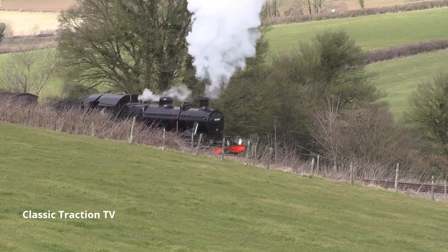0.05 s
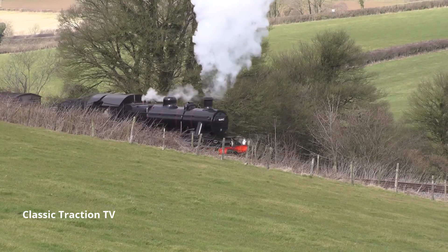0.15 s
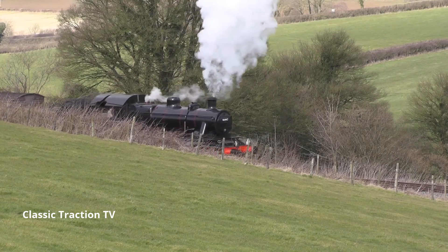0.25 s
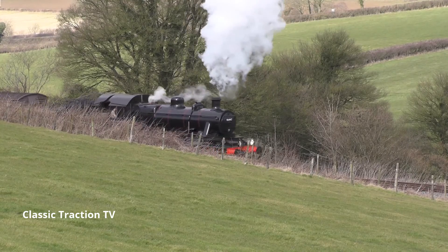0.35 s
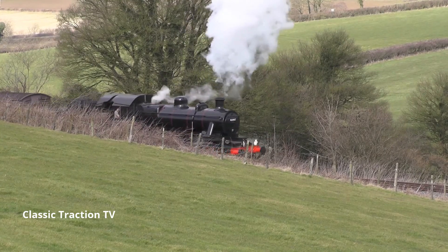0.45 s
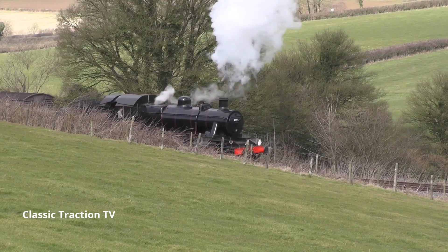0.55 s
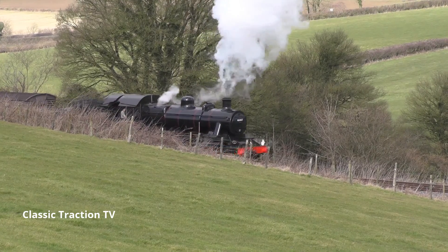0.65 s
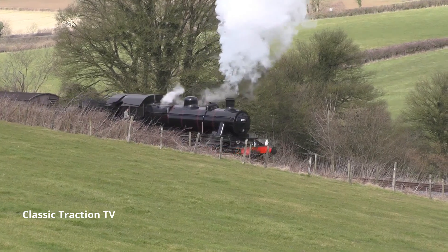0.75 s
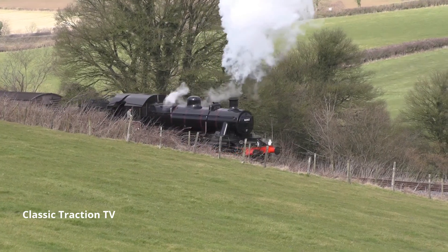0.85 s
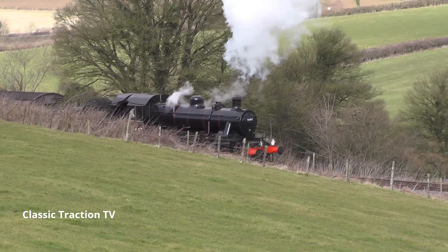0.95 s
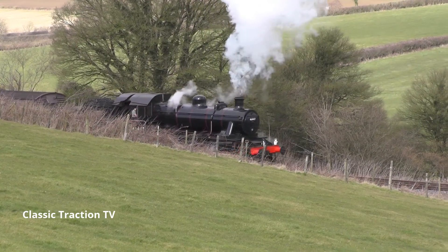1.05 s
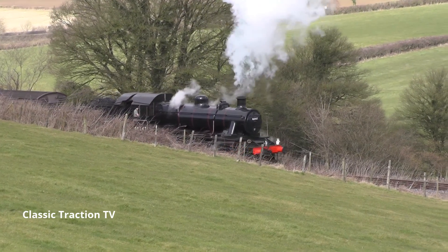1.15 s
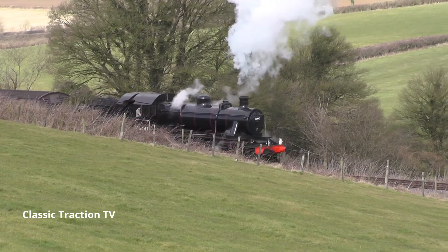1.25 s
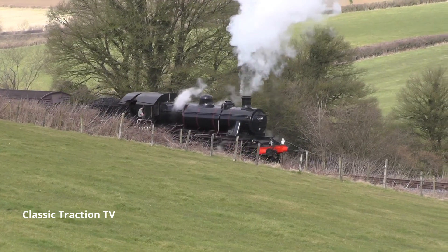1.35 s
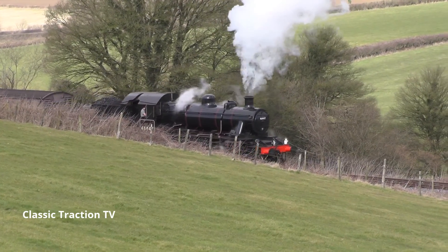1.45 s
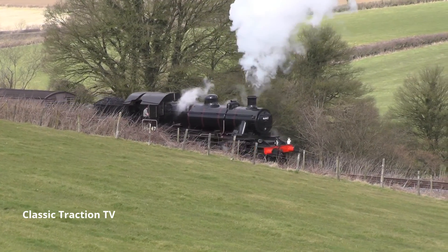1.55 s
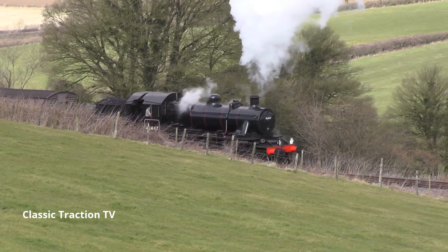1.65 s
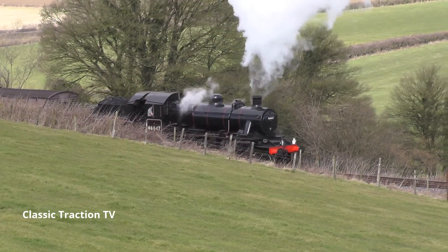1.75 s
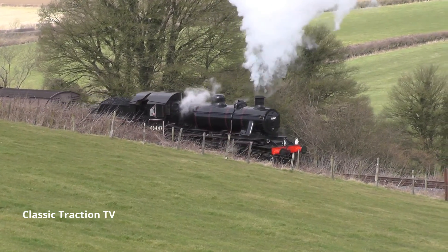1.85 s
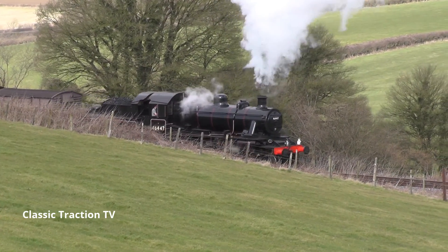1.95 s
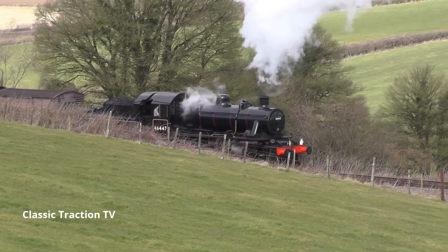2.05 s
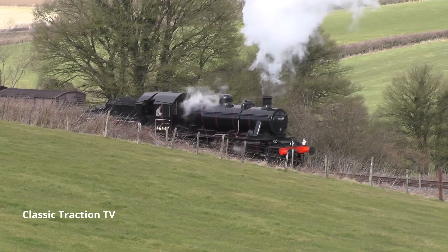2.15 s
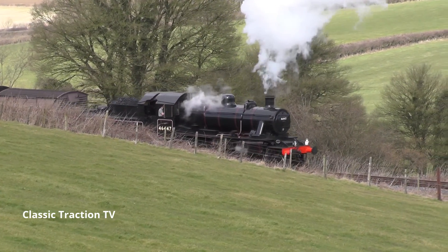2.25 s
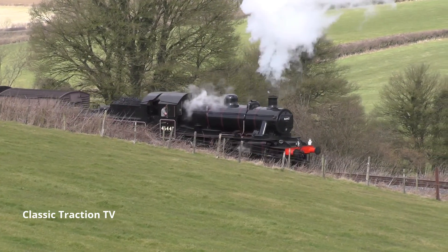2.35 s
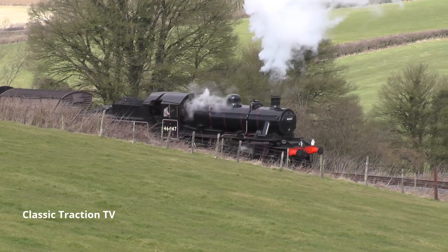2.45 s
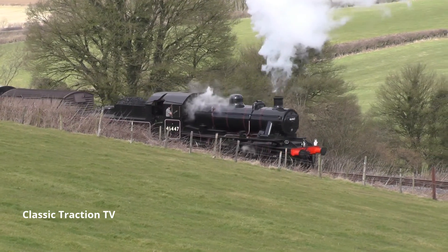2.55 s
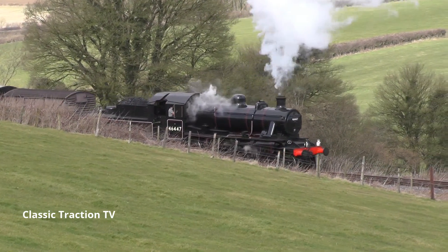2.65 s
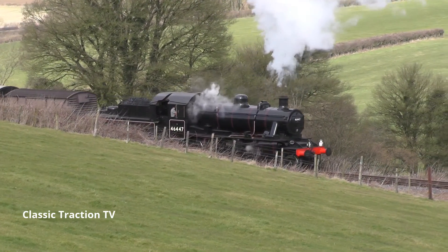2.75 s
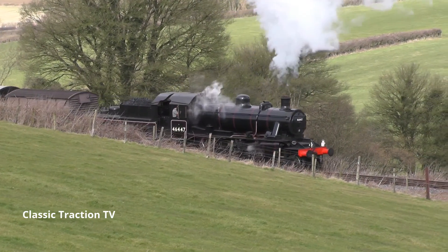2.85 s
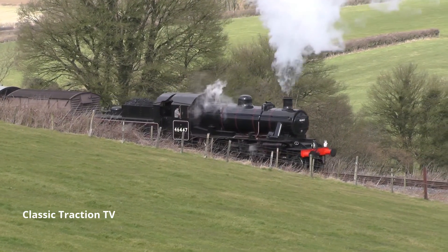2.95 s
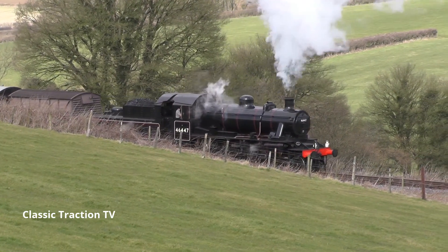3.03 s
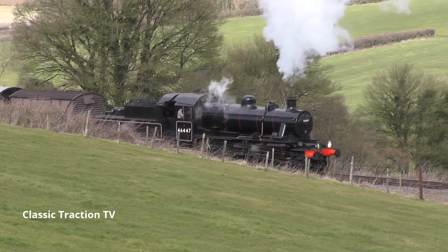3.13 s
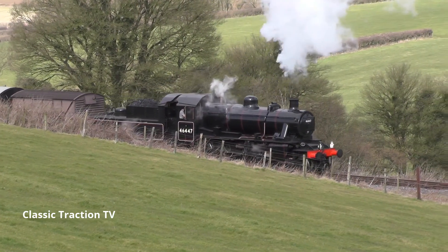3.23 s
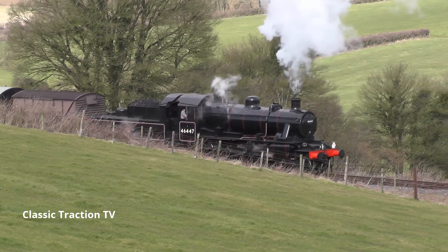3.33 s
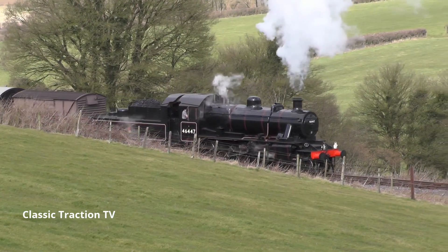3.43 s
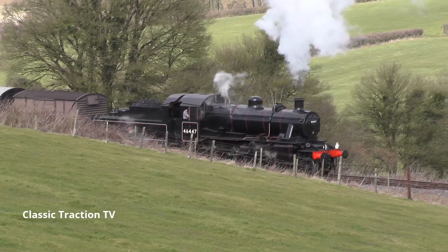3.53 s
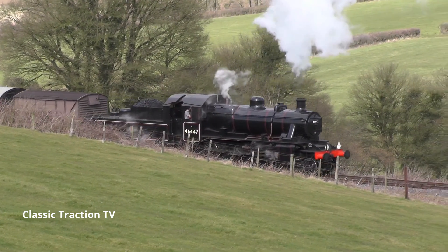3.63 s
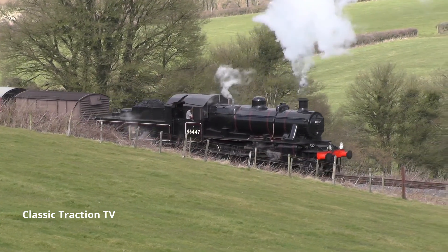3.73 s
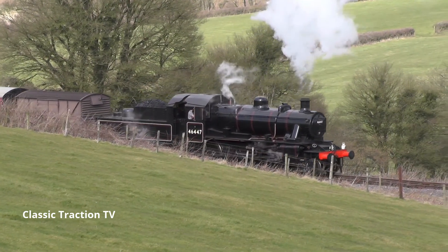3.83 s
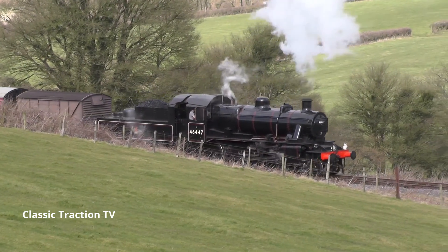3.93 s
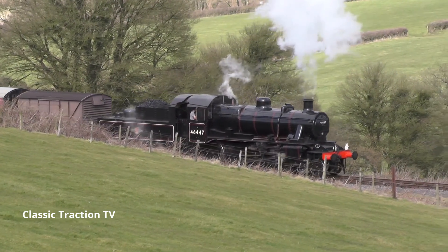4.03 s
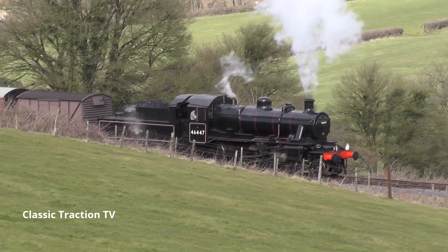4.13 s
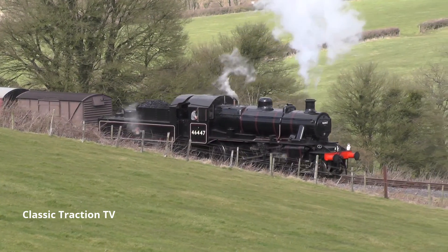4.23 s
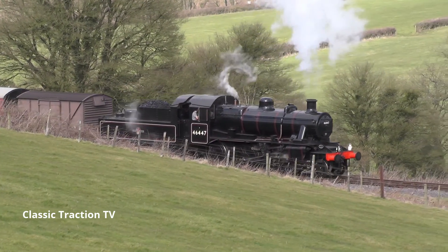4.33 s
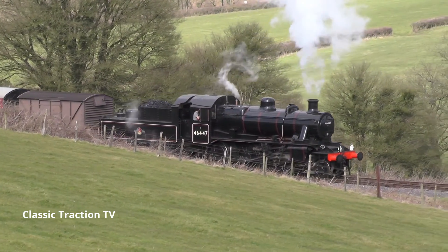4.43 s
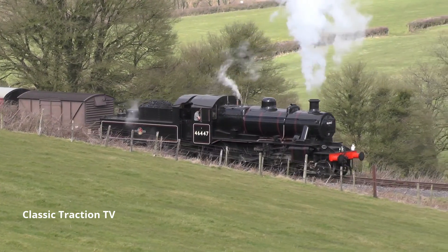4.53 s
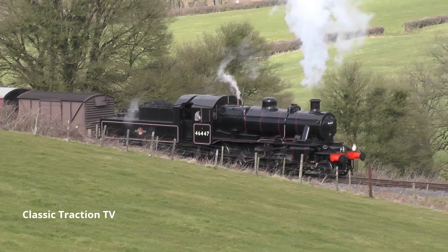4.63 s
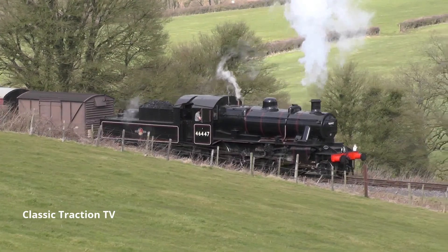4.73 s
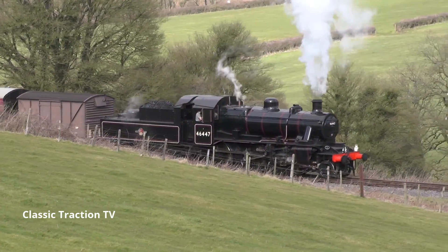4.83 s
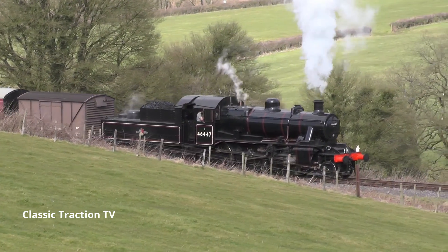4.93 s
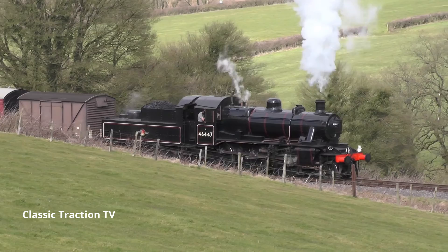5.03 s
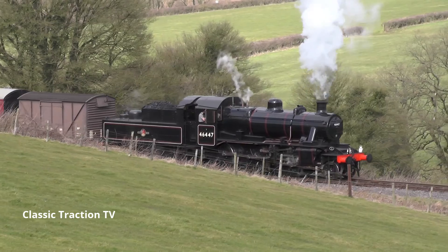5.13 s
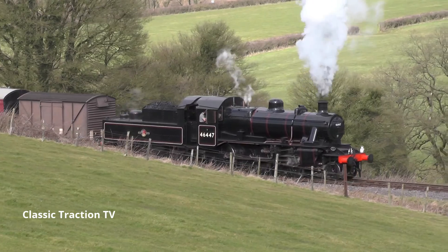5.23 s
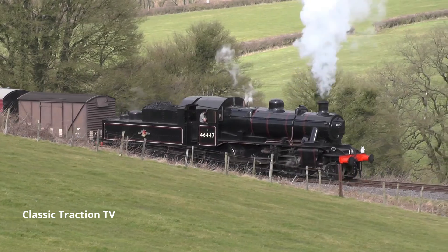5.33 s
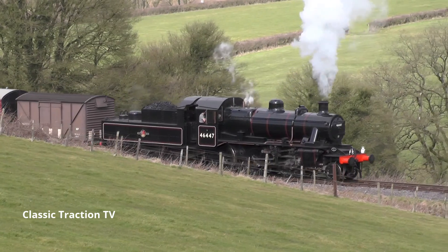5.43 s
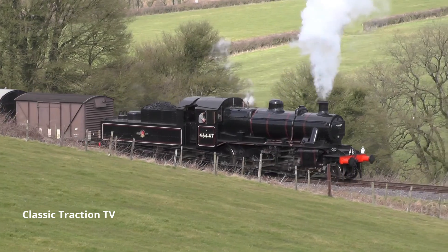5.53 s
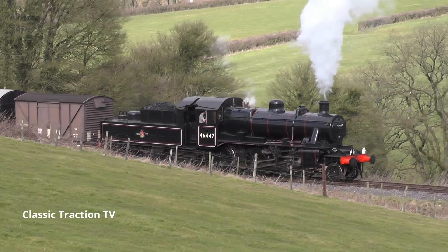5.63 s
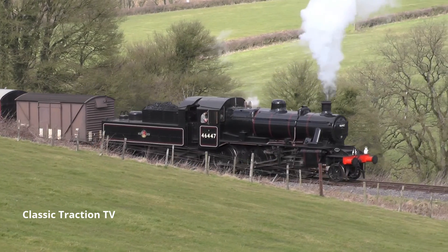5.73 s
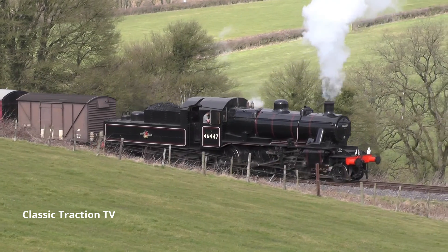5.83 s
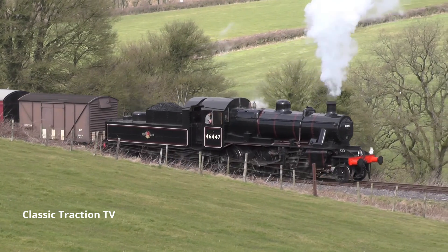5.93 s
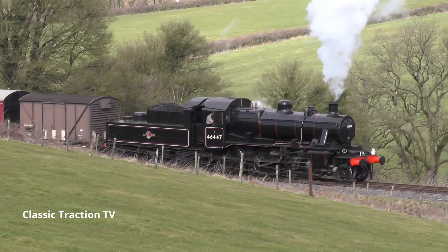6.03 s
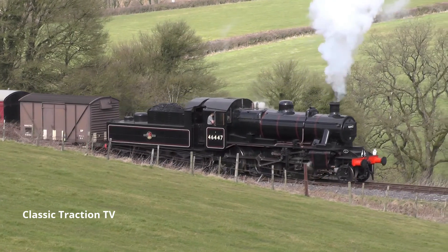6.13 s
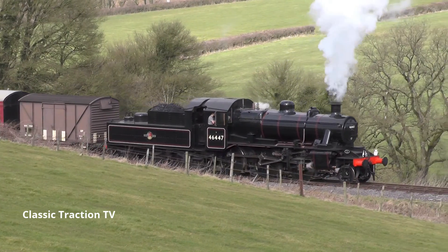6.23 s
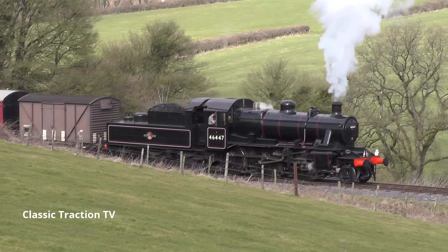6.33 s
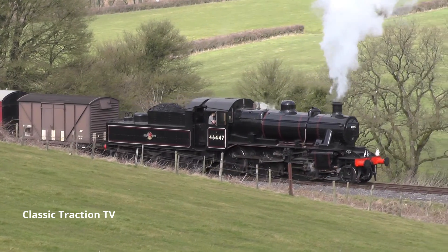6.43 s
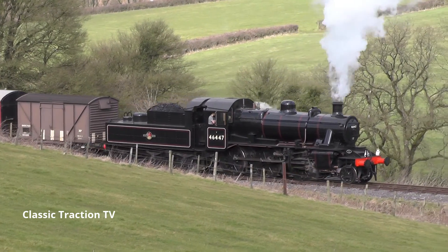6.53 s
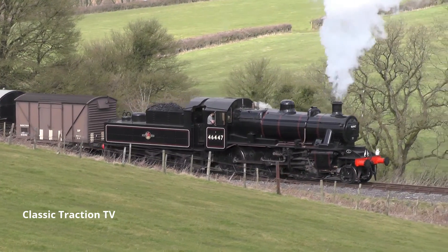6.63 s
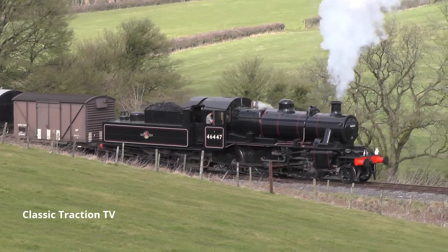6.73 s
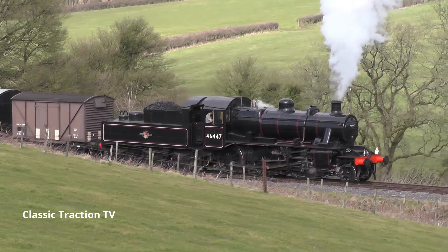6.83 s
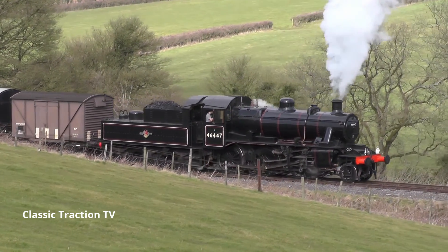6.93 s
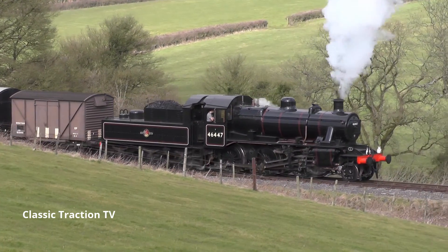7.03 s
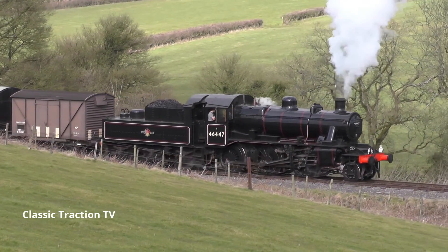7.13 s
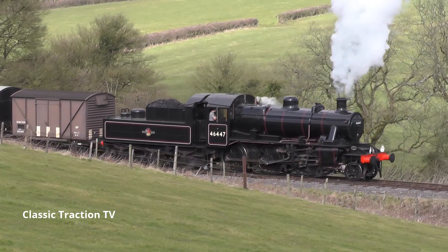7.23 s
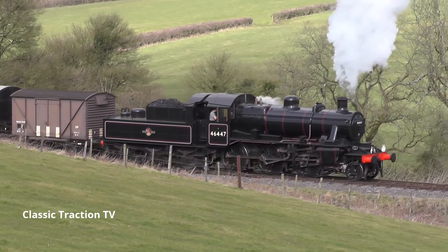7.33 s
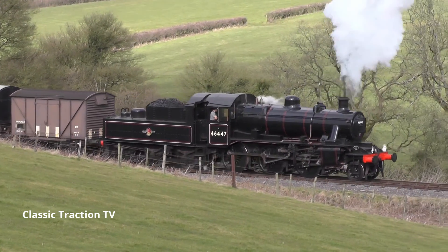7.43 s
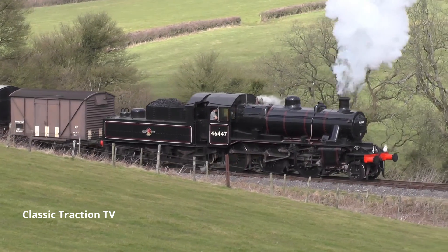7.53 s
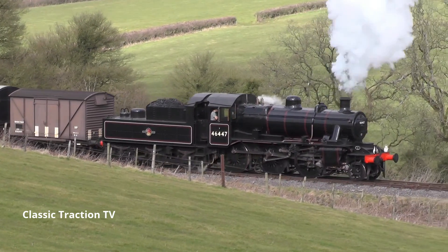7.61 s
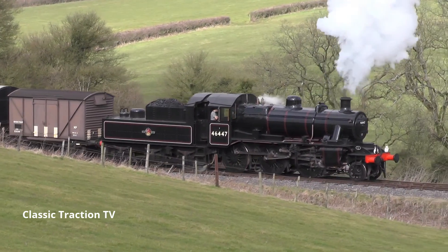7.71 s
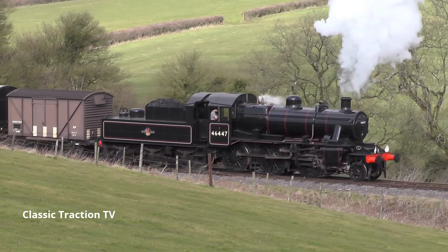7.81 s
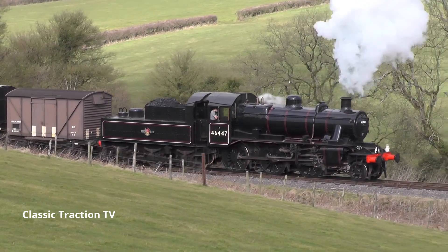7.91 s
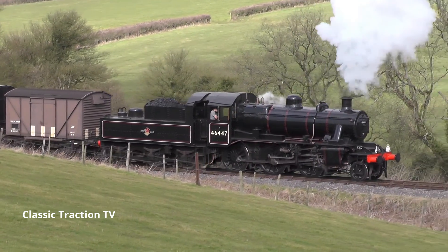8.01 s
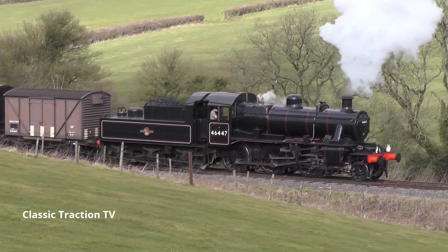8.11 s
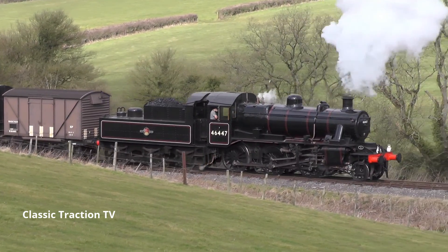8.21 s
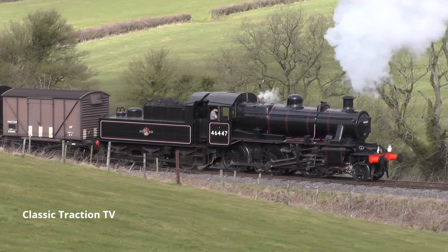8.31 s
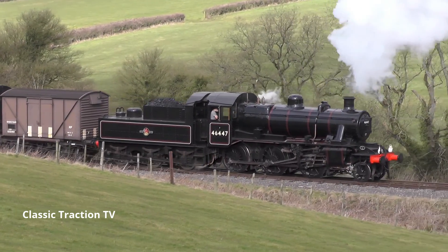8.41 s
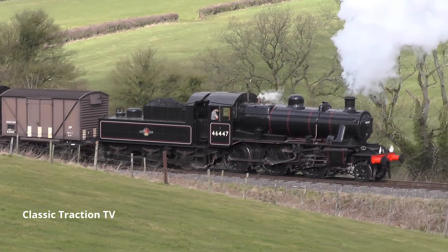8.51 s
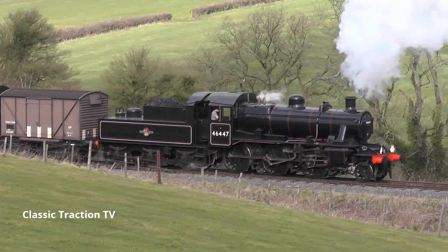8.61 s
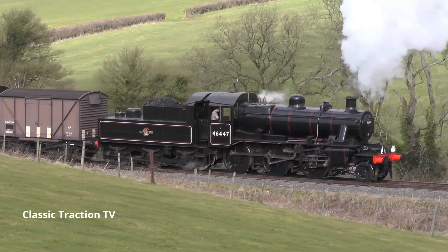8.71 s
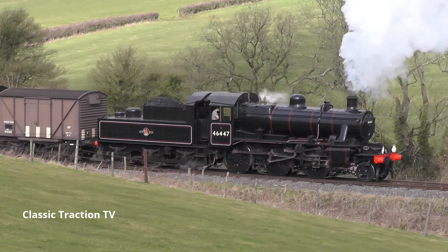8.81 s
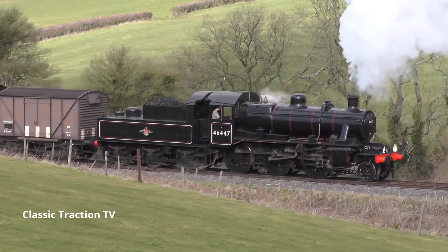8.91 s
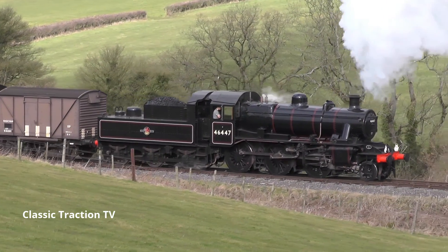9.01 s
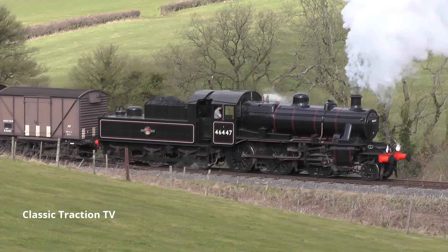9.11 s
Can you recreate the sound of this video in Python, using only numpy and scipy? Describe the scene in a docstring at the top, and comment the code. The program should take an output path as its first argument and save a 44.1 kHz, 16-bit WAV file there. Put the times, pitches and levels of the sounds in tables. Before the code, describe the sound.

Regular exhaust beats of a working steam engine, first distant, dull and booming, then stronger with a rough rush of steam after four seconds. Under them lie steady wagon rumble, faint metallic wheel ringing, rail sizzle and leaking steam. The train sits somewhat left, with a dull short echo from trees behind. Soft low gusts come and go, becoming strong microphone buffeting in the last three seconds.

```python
"""A steam locomotive and its wagons draw near, beating from about 2.5 to over 3 times a second.
First come muffled chimney booms (noise through resonances), some with a sharp spit of steam, over rumble,
ringing wheels (noise-driven modes), rail treble and leaking steam (coloured noise).
From about 4 s the beats grow louder, with a stronger rush of steam (flow-gated noise bands).
Breeze (opposed and separate low noise) comes in gusts, strongest in the last 3 s; trees add a dull tail."""
import sys
import numpy as np
from scipy import signal
from scipy.fft import rfft, irfft, next_fast_len
from scipy.io import wavfile
from scipy.ndimage import uniform_filter1d, map_coordinates

SR = 44100
rng = np.random.default_rng(int(sys.argv[2]) if len(sys.argv) > 2 else 0)


def store_wav(level_fs):
    """Save 16-bit WAV to argv[1]."""
    pcm = np.round(np.clip(np.atleast_2d(level_fs), -1, 1) * 32767)
    wavfile.write(sys.argv[1], SR, pcm.T.astype(np.int16))


N = 403956
TIME = np.arange(N) / SR
SIZE = next_fast_len(N)
FREQS = np.arange(SIZE // 2 + 1) * SR / SIZE

# Levels are before the trims in the functions; spectra and modes are relative.
# exhaust beats: [t/s, rasp level/dB, hiss level/dB, rasp brightness/dB]
BEATS = [(-0.015, -55.5, -60.5, 0), (0.382, -60, -62.5, -9), (0.789, -49.5, -64, 5),
         (1.18, -53.5, -81, -0.5), (1.573, -49.5, -61, -3.5), (1.965, -55.5, -77, -3),
         (2.363, -52.5, -59, -1), (2.75, -50.5, -66, 3), (3.126, -49.5, -76, -2), (3.512, -49.5, -56, 2),
         (3.889, -46, -65, 6.5), (4.258, -55, -63, 1), (4.619, -45, -56, -1), (4.982, -38.5, -49.5, 3.5),
         (5.347, -35.5, -49.5, 0), (5.689, -45, -62.5, 1), (6.031, -37.5, -58.5, -3), (6.367, -40, -50, -4),
         (6.711, -37.5, -55, 0.5), (7.035, -45, -57.5, -3.5), (7.362, -47.5, -61.5, -5),
         (7.683, -41.5, -52.5, 0), (8.007, -40, -52.5, 0), (8.316, -43.5, -62.5, -9.5),
         (8.624, -45, -59.5, -6.5), (8.937, -52, -64, -8)]
# nearing engine: [t/s, boom level/dB, roar level/dB, hiss lead/s]
NEARNESS = [(0, -28.5, -57, 0.025), (.8, -28, -46.5, 0.018), (1.9, -29, -51.5, 0.025),
            (3.2, -27, -52.5, 0.026), (4.3, -22, -47, 0.0056), (5.35, -20.5, -37.5, 0.014),
            (6, -21.5, -38.5, 0.008), (7, -19.5, -37.5, 0.0015), (9.16, -22.5, -41.5, 0.00057)]
# nearing path: [t/s, Doppler pitch ratio, ground dip/dB, boom brightness/dB]
APPROACH = [(0, 1.062, -3.5, -2.5), (3, 0.97, -3.5, 2.5), (5, 0.93, -2, 1), (7, .975, 0, -1.5),
            (9.16, 0.92, -0.5, -5)]
# flow of a beat through chimney, through jet: (attack/s, hold/s, release/dB per s)
CHIMNEY_FLOW = (0.08, 0.028, 373)
JET_FLOW = (0.074, 0.021, 300)
# deepest part of the boom: slower, longer; same columns
DEEP_FLOW, DEEP_BELOW_HZ = (0.084, 0.038, 340), 255
# chimney and smokebox resonances: [f/Hz, width/Hz, level/dB]
CHIMNEY_MODES = [(116, 47.5, -9), (170.8, 25.6, -1), (206.4, 26.1, 1.5), (235.5, 24.4, -2.5),
                 (276, 24, -6.5), (348.6, 28, -7.5), (407, 66, -13.5)]
# jet spectra, large eddies to finest: [f/Hz, level/dB per Hz]
ROAR_SPECTRUM = [(250, -24), (420, 9.5), (500, 3.5), (600, -1), (720, -1.5), (860, -3), (1050, -9),
                 (1500, -5.5), (1900, -13), (2600, -44)]
RASP_SPECTRUM = [(1200, -25.5), (1750, 2), (2200, 2), (2700, 1), (3150, 2), (4000, -2), (4700, -8),
                 (6500, -31.5)]
HISS_SPECTRUM = [(3300, -26), (4600, 5.5), (5500, 3.5), (6200, 1.5), (7100, 1.5), (8000, -5), (9200, -10.5),
                 (10500, -37), (12500, -25.5), (16000, -52)]
# jet start offset from the boom, before the leads; roar and rasp take a share of the hiss lead;
# in early beats hiss and rasp come ahead of the boom
JET_OFFSET_S, ROAR_LEAD_SHARE, RASP_LEAD_SHARE = 0.01, 0.5, 0.77
# spits as a valve first cracks open: [t/s, level/dB]
SPITS = [(.012, -48.5), (.412, -49.5), (.815, -46), (1.596, -46), (2.382, -53), (2.777, -56), (3.15, -49),
         (3.917, -45)]
# flow of a spit: (attack/s, hold/s, release/dB per s)
SPIT_FLOW = (0.014, 0.0018, 320)
# spit spectrum: [f/Hz, level/dB per Hz]
SPIT_SPECTRUM = [(2000, -24.5), (3200, 6), (4800, -3), (5900, 0), (7000, -21), (10000, -36)]

# wagon rumble, rail treble, leaking steam spectra: [f/Hz, level/dB per Hz]
RUMBLE_SPECTRUM = [(40, 11), (90, 1), (200, 3), (330, -1.5), (420, -5), (520, -11), (650, -14),
                   (810, -13.5), (950, -20), (1600, -24), (3000, -33.5)]
RAIL_SPECTRUM = [(900, -23), (1600, -3), (2100, 1), (2700, 4.5), (3300, 6), (4100, 6.5), (4800, 1),
                 (7000, -17)]
LEAK_SPECTRUM = [(3000, -26.5), (4600, -9), (5100, -0.5), (5500, 3), (6100, -2), (7000, 1.5), (8000, -6),
                 (9200, -5.5), (10500, -24), (12500, -11.5), (16000, -44.5)]
# ringing wheel modes: [f/Hz, width/Hz, level/dB]
WHEEL_MODES = [(1870, 53, 4), (1925, 39, 2), (2320, 20, -3.5), (2840, 22, -14), (3358, 50, -0.5),
               (3670, 82, -9.5), (4140, 170, -24)]
# rail treble (also drives the high ring), low wheel ring, leak: [t/s, level/dB]
RAIL_LEVEL = [(0.0, -61), (1.73, -55), (2.11, -60), (3.03, -54), (3.85, -55.5), (4.11, -64), (4.62, -57),
              (5.28, -45.5), (5.54, -54), (5.99, -54.5), (6.23, -52), (6.91, -52), (7.35, -59), (8.01, -50),
              (8.54, -58.5), (9.16, -55.5)]
LOW_RING_LEVEL = [(0.0, -83), (0.43, -73), (0.66, -65), (0.94, -73), (1.5, -64.5), (2.09, -73.5),
                  (3.01, -61.5), (4.39, -73), (5.05, -65), (5.23, -54), (5.79, -67), (6.3, -58.5),
                  (6.61, -64), (7.02, -63), (7.17, -67), (7.96, -63), (9.16, -65.5)]
LEAK_LEVEL = [(0.0, -74), (0.74, -62.5), (1.07, -70), (1.68, -64), (2.07, -69), (3.75, -62.5),
              (4.18, -68.5), (5.02, -57), (5.81, -66), (6.45, -66.5), (6.58, -61), (7.3, -68.5),
              (7.83, -63.5), (9.16, -69)]
RUMBLE_START_DB, RUMBLE_RISE_DB_PER_S = -50.5, 0.58
LOW_RING_BELOW_HZ = 2100

# left-right balance of the train at the two microphone ports: [f/Hz, level/dB]
BALANCE = [(100, 5), (300, 4.5), (600, 3.5), (1200, 5), (2900, 1.6), (5000, 0), (7000, 8), (10000, -0.5)]
# left lead over right: [f/Hz, phase/rad]
PORT_PHASE = [(200, 0), (1500, .1), (2800, .4), (4000, 1.2), (5000, 1.95), (6500, 2.15), (7700, 1.7),
              (8800, 2), (9800, 2.95), (11500, 3.25), (13000, 3.9)]
# breeze buffeting: [t/s, level/dB]
GUSTS = [(0.03, -51), (1.52, -59), (2.23, -32.5), (2.93, -48.5), (3.43, -31.5), (4.53, -44.5),
         (4.73, -37.5), (5.23, -54), (5.63, -31), (5.73, -40.5), (6.23, -21.5), (6.73, -24), (6.93, -35),
         (7.53, -21), (7.83, -20), (8.23, -29.5), (8.43, -17.5), (9.12, -18)]
# breeze spectrum: [f/Hz, level/dB per Hz]
WIND_SPECTRUM = [(8, -6.5), (16, 0.5), (25, -0.5), (40, -7.5), (65, -12.5), (100, -21), (150, -31),
                 (250, -40), (500, -55.5), (1200, -86.5)]
TREES_DB, EVEN_HISS_DB = -20.5, -74
CUTOFF_HZ, FADE_S = 15750, 0.003


def exhaust(boom_trim_db=-1.0, roar_trim_db=1.07, rasp_trim_db=2.0, hiss_trim_db=5.0,
            spit_trim_db=-1.5, flutter_db=0.5, flutter_hz=90):
    """Each blast booms in the chimney and tears into a jet whose bands flutter together."""
    beat_s, rasp_db, hiss_db, rasp_tilt_db = np.transpose(BEATS)
    boom_db, roar_db, lead_s = in_time(NEARNESS, beat_s)
    # the finest eddies lead the coarser ones, while the valve is still narrow
    start_s = beat_s + JET_OFFSET_S
    roar_s = start_s - ROAR_LEAD_SHARE * lead_s
    rasp_s = start_s - RASP_LEAD_SHARE * lead_s
    hiss_s = start_s - lead_s
    jet = noise(ROAR_SPECTRUM) * puffs(roar_s, roar_db + roar_trim_db, JET_FLOW)
    tilt_db = np.interp(TIME, start_s + JET_FLOW[0], rasp_tilt_db)
    rasp = tilted(noise(RASP_SPECTRUM), hz=2780, tilt_db=tilt_db)
    jet += rasp * puffs(rasp_s, rasp_db + rasp_trim_db, JET_FLOW)
    jet += noise(HISS_SPECTRUM) * puffs(hiss_s, hiss_db + hiss_trim_db, JET_FLOW)
    spit_s, spit_db = np.transpose(SPITS)
    jet += noise(SPIT_SPECTRUM) * puffs(spit_s, spit_db + spit_trim_db, SPIT_FLOW)
    return boom(beat_s, boom_db + boom_trim_db) + jet * from_db(flutter_db * drift(flutter_hz))


def boom(beat_s, levels_db, band_hz=(105, 470)):
    """Each blast rings the chimney and smokebox, its deepest part building more slowly."""
    _, _, tilt_db = in_time(APPROACH)
    pipe = doppler(resonate(rng.standard_normal(N), CHIMNEY_MODES))
    band = signal.butter(2, band_hz, "band", fs=SR, output="sos")
    pipe = tilted(signal.sosfilt(band, pipe), hz=190, tilt_db=tilt_db)
    pipe = evened(pipe, span_s=0.043)
    deep = below(pipe, DEEP_BELOW_HZ)
    upper = pipe - deep
    return deep * puffs(beat_s, levels_db, DEEP_FLOW) + upper * puffs(beat_s, levels_db, CHIMNEY_FLOW)


def puffs(times_s, levels_db, flow):
    """One swell of flow per valve opening: smooth rise, hold, exponential decay."""
    attack_s, hold_s, release_db_per_s = flow
    age_s = np.arange(SR // 2) / SR
    rise = np.sin(np.pi / 2 * np.minimum(age_s / attack_s, 1)) ** 2
    decay = from_db(-release_db_per_s * np.maximum(age_s - attack_s - hold_s, 0))
    swell = rise * decay
    out = np.zeros(N)
    for t, level_db in zip(times_s, levels_db):
        at = np.arange(len(age_s)) + int(t * SR)
        inside = (at >= 0) & (at < N)
        out[at[inside]] += from_db(level_db) * swell[inside]
    return out


def doppler(x):
    """Resample along the pitch ratio: raised at first, lowered later."""
    ratio, *_ = in_time(APPROACH)
    return map_coordinates(x, [np.cumsum(ratio)], order=1, mode="mirror")


def rolling(rail_trim_db=-5.0, low_ring_trim_db=3.0, high_ring_trim_db=-6.0, leak_trim_db=4.5):
    """Rough rails shake the wagons and keep the wheel modes ringing; steam leaks from the engine."""
    rail_db, = in_time(RAIL_LEVEL)
    low_ring_db, = in_time(LOW_RING_LEVEL)
    leak_db, = in_time(LEAK_LEVEL)
    rumble_db = RUMBLE_START_DB + RUMBLE_RISE_DB_PER_S * TIME
    wagons = noise(RUMBLE_SPECTRUM) * from_db(rumble_db + 1.43 * drift(11))
    rails = noise(RAIL_SPECTRUM) * from_db(rail_db + rail_trim_db + 0.63 * drift(18))
    low_modes = [m for m in WHEEL_MODES if m[0] < LOW_RING_BELOW_HZ]
    high_modes = [m for m in WHEEL_MODES if m[0] >= LOW_RING_BELOW_HZ]
    ring = ringing(low_modes) * from_db(low_ring_db + low_ring_trim_db)
    ring += ringing(high_modes) * from_db(rail_db + high_ring_trim_db)
    steam = noise(LEAK_SPECTRUM) * from_db(leak_db + leak_trim_db + 0.77 * drift(30))
    return wagons + rails + ring + steam


def ringing(modes):
    """Wheel modes kept ringing by the rough rail, each swelling on its own; rms 1."""
    rings = [resonate(rng.standard_normal(N), [mode]) * from_db(2.8 * drift(7.9)) for mode in modes]
    return rms_one(sum(rings))


def over_grass(x, dip_hz=600, width_octaves=0.3):
    """While the train is far, the echo off the grass cancels part of the middle range."""
    _, dip_db, _ = in_time(APPROACH)
    octaves = np.log2((FREQS + 1e-6) / dip_hz)
    band = filtered(x, np.exp(-0.5 * (octaves / width_octaves) ** 2))
    return x + band * (from_db(dip_db) - 1)


def moving_air(x, depth_at_4khz_db=1.5, rate_hz=18):
    """Eddies along the path make each band swell and fade on its own, more towards the treble."""
    centres_hz = np.geomspace(700, 11000, 9)
    out = 0
    for hz, pick in zip(centres_hz, np.eye(len(centres_hz))):
        band = filtered(x, np.interp(FREQS, centres_hz, pick))
        depth_db = depth_at_4khz_db * np.sqrt(hz / 4000)
        out = out + band * from_db(depth_db * drift(rate_hz))
    return out


def ports(x):
    """The train lies to the left; the two ports part in phase towards the treble."""
    ratio, phase_rad = from_db(at_hz(BALANCE)), at_hz(PORT_PHASE)
    left_right = np.array([ratio * np.exp(1j * phase_rad), np.ones_like(ratio)])
    return filtered(x, left_right * np.sqrt(2 / (1 + ratio ** 2)))


def trees(x, t60_s=0.79, onset_s=0.03):
    """The wood behind the line scatters a dull, decaying tail, different on each side."""
    tail = rng.standard_normal((2, N)) * from_db(-60 * TIME / t60_s) * (TIME > onset_s)
    tail /= np.sqrt(np.sum(tail ** 2, axis=1, keepdims=True))
    return filtered(x, rfft(tail, SIZE) / (1 + FREQS / 6000))


def wind(left_trim_db=3.5, right_trim_db=-0.5, opposed_share=0.084, lumps_db=2.4, lumps_hz=10):
    """Eddies push on one port as they pull on the other, and each port has eddies of its own."""
    gust_db, = in_time(GUSTS)
    opposed = noise(WIND_SPECTRUM) * np.array([[1], [-1]])
    own = np.array([noise(WIND_SPECTRUM), noise(WIND_SPECTRUM)])
    eddies = np.sqrt(opposed_share) * opposed + np.sqrt(1 - opposed_share) * own
    level_db = gust_db + lumps_db * drift(lumps_hz) + np.array([[left_trim_db], [right_trim_db]])
    return evened(eddies, span_s=0.15) * from_db(level_db)


def noise(spectrum):
    """Turbulence of a given colour, falling away beyond its ends; rms 1."""
    low_skirt = 1 / (1 + (spectrum[0][0] / (2 * FREQS + 1e-6)) ** 2)
    high_skirt = 1 / (1 + (FREQS / spectrum[-1][0] / 2) ** 4)
    response = from_db(at_hz(spectrum)) * low_skirt * high_skirt
    return rms_one(filtered(rng.standard_normal(N), response))


def drift(rate_hz):
    """Slow chance with spread 1: noise low-passed at a rate."""
    return rms_one(filtered(rng.standard_normal(SIZE), 1 / (1 + (FREQS / rate_hz) ** 4)))


def resonate(x, modes):
    """Parallel two-pole resonances of alternating sign."""
    out = 0
    for k, (hz, width_hz, level_db) in enumerate(modes):
        r = np.exp(-np.pi * width_hz / SR)
        gain = (-1) ** k * from_db(level_db) * (1 - r * r) / 2
        poles = [1, -2 * r * np.cos(2 * np.pi * hz / SR), r * r]
        out = out + gain * signal.lfilter([1, 0, -1], poles, x)
    return out


def evened(x, span_s):
    """Hold the power of a turbulent flow steady over a given span; rms near 1."""
    size = max(int(span_s * SR), 2)
    power = uniform_filter1d(uniform_filter1d(x ** 2, size), size)
    return x / np.sqrt(power + 1e-12)


def tilted(x, hz, tilt_db):
    """Raise what lies above a frequency against what lies below it."""
    low = below(x, hz)
    gain = from_db(tilt_db)
    return (low + gain * (x - low)) * np.sqrt(2 / (1 + gain ** 2))


def below(x, hz):
    """The part below a frequency, by a steep low-pass."""
    return filtered(x, 1 / (1 + (FREQS / hz) ** 16))


def filtered(x, response):
    """Apply a frequency response."""
    return irfft(rfft(x, SIZE) * response, SIZE)[..., :N]


def at_hz(points):
    """A table over frequency, joined on a log axis."""
    hz, value = np.transpose(points)
    return np.interp(np.log(FREQS + 1e-6), np.log(hz), value)


def in_time(rows, times_s=TIME):
    """Each column of a curve at the given times, or at every sample."""
    s, *columns = np.transpose(rows)
    return [np.interp(times_s, s, c) for c in columns]


def rms_one(x):
    """Scale to unit power."""
    return x / np.sqrt(np.mean(x ** 2) + 1e-20)


def from_db(db):
    """Decibels to amplitude gain."""
    return 10 ** (np.asarray(db) / 20)


def scene():
    """Train, its scatter from the trees, breeze and a faint even hiss."""
    train = moving_air(over_grass(exhaust() + rolling()))
    even_hiss = from_db(EVEN_HISS_DB) * rng.standard_normal((2, N))
    return ports(train) + from_db(TREES_DB) * trees(train) + wind() + even_hiss


def record(dry):
    """The top is cut steeply, and the sound closes with a short fade."""
    fade = np.sin(np.pi / 2 * np.minimum((TIME[-1] - TIME) / FADE_S, 1)) ** 2
    return filtered(dry * fade, 1 / np.sqrt(1 + (FREQS / CUTOFF_HZ) ** 160))


dry = scene()
out = record(dry)
store_wav(out)
```